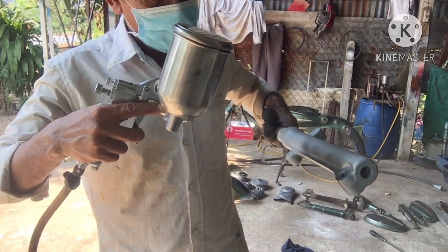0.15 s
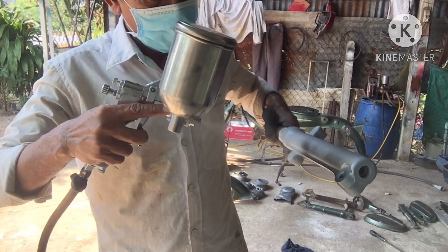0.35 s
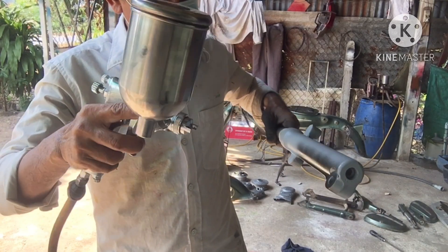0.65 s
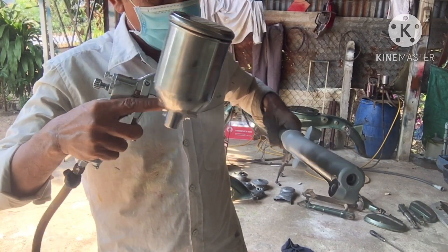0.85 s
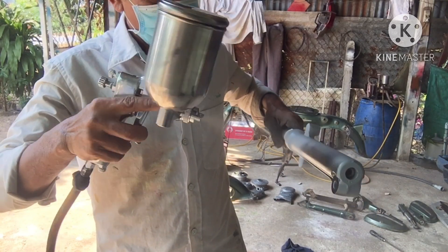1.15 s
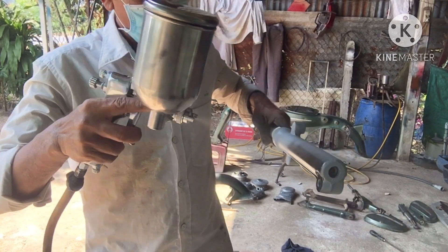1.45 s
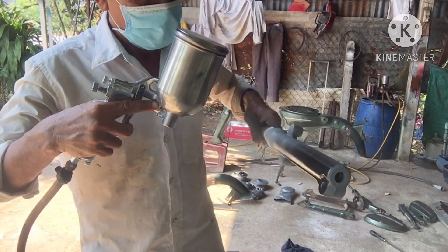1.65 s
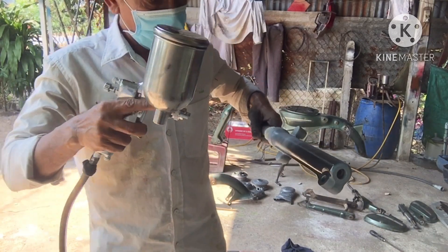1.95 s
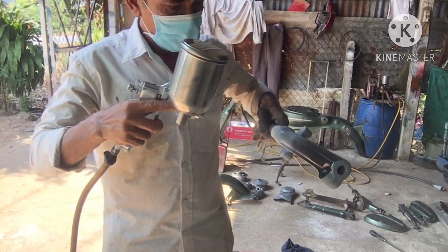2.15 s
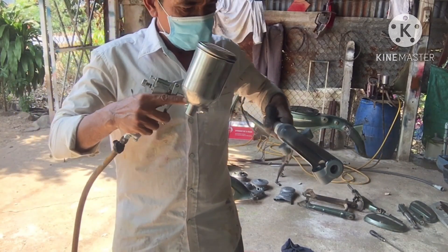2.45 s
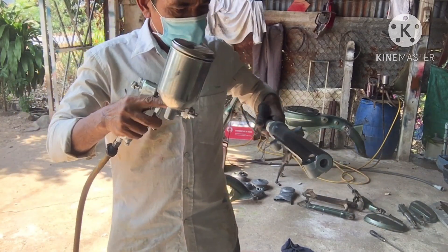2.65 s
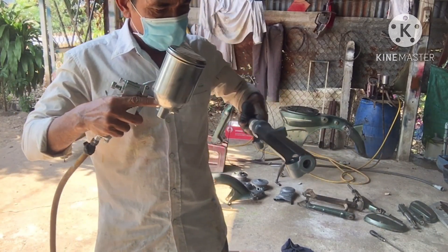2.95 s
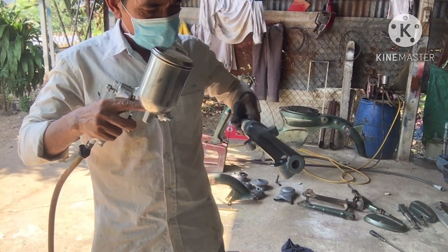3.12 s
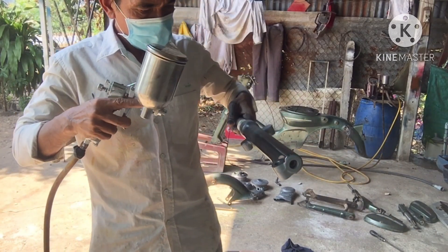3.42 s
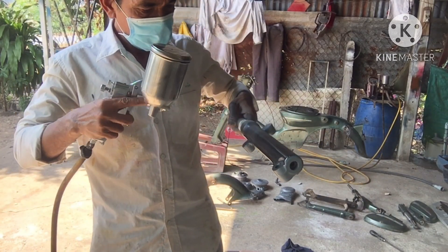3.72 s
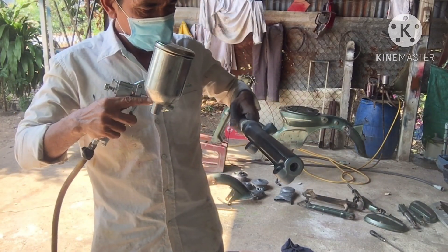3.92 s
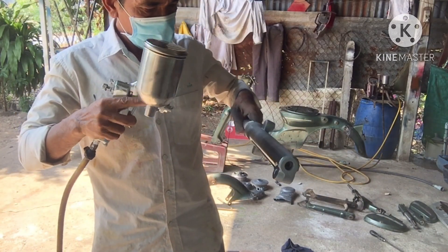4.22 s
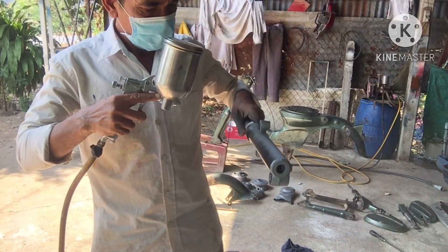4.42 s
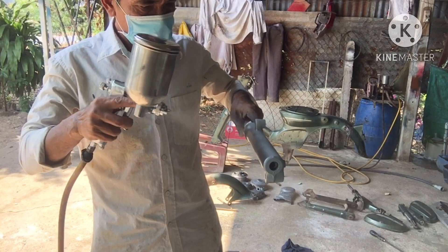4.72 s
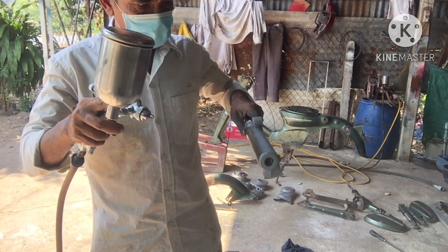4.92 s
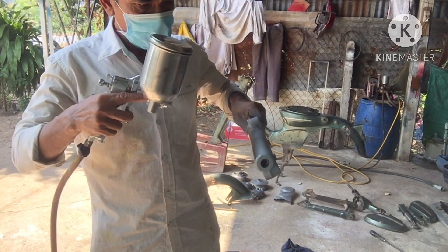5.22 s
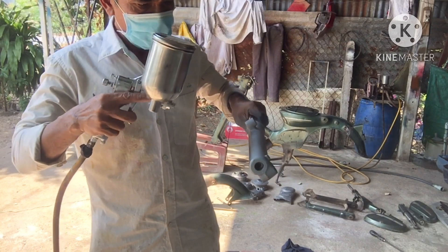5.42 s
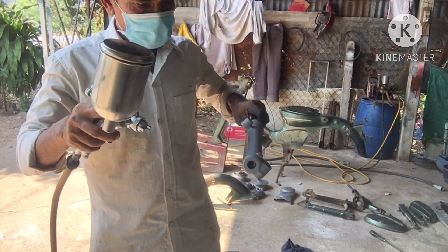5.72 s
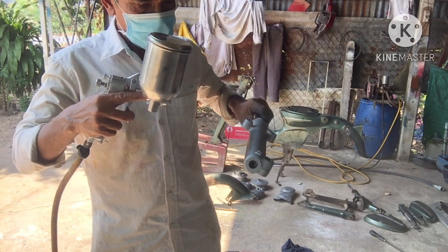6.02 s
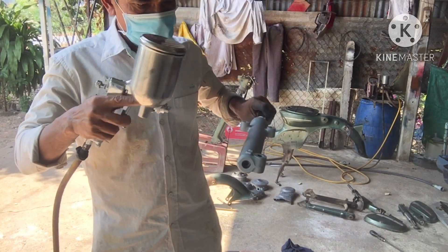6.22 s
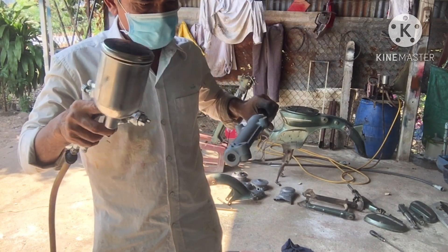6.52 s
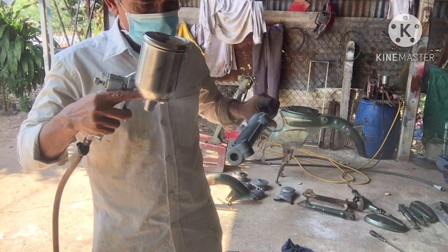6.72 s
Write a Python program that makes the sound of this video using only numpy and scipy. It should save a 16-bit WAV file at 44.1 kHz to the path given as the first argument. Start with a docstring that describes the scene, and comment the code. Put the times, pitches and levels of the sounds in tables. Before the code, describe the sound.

In an open workshop, an air compressor runs in the background with a fast, even chug and a wavering low hum. In front of it, near the microphone, a paint spray gun gives an unbroken hiss that sharpens and softens as it passes back and forth. Thin, brief whistles flick through the spray now and then, and soft puffs of air rumble on the microphone.

```python
"""A close, unbroken hiss: a compressed-air spray gun sweeps paint over a metal part near a phone.
Its turbulent jet turns bright and dull as each pass aims it toward and away from the phone,
and whistles briefly where it grazes an edge. Further back in the open-sided workshop a piston
compressor chugs eleven times a second, valve puffs ringing its intake while its motor hums
and drones. Stray air rumbles softly underneath."""
import sys
import numpy as np
from scipy import signal
from scipy.fft import rfft, irfft
from scipy.io import wavfile
from scipy.ndimage import uniform_filter1d, map_coordinates

SR = 44100
rng = np.random.default_rng(int(sys.argv[2]) if len(sys.argv) > 2 else 0)


def transcribe(signal):
    """Save signal, clipped to [-1, 1], as a 16-bit WAV file at the path in sys.argv[1]."""
    frames = np.atleast_2d(signal).T
    limited = np.clip(frames, -1, 1)
    pcm = np.round(limited * 32767).astype(np.int16)
    wavfile.write(sys.argv[1], SR, pcm)


N = 302967
TIME = np.arange(N) / SR
FREQ = np.maximum(np.arange(N // 2 + 1) * SR / N, 1e-3)
NARROW_HZ, TOP_HZ = 7030, 15730  # the top band of the hiss, where the jet beams most narrowly

# colour of the stray air and the yard: (frequency [Hz], relative level [dB])
RUMBLE_COLOUR = [(20, -40), (32, -24), (45, -24), (80, 4), (125, 0), (200, 2.5), (450, 1.5), (750, -12),
                 (1500, -87)]
# puffs of stray air on the microphone: (time [s], half length [s], level [dB])
AIR_GUSTS = [(.1, .2, -42.5), (4.54, 0.056, -41), (5.25, 0.037, -39), (5.703, .1, -45), (6.023, 0.081, -50)]
# motor and belt tones: (frequency [Hz], level [dB], waver [0-1])
MOTOR_TONES = [(99.7, -52.5, 0.22), (235, -51.5, 0.14), (517, -72, 0.04), (652, -53.5, .7),
               (688, -53, 0.48), (697, -53, 0.67), (1032, -59, 0.5), (1072, -55, 0.28)]
# strongest swells of the drone: (time [s], level [dB])
DRONE_SWELLS = [(1.7, -43), (2.57, -40), (3.25, -43), (3.51, -42), (4.4, -42), (5.3, -38), (6.04, -40)]
# compressor speed: (time [s], speed [turns/s])
CRANK_SPEED = [(0, 11.136), (3, 11.144), (6.87, 11.159)]
# valve puffs in each crank turn: (position [turns], relative level [dB])
VALVE_PUFFS = [(.04, -3.8), (.137, -4.8), (.198, 2.6), (.273, -4.1), (.434, -11), (.613, -6.7),
               (.824, -4.5)]
# resonances of the intake and tank: (frequency [Hz], width [Hz], relative level [dB])
INTAKE_MODES = [(100, 100, -25), (318, 42, 0), (445, 48, -20), (615, 45, -23), (682, 28, -15)]
# the jet grazing an edge: (time [s], half length [s], frequency [Hz], level [dB])
EDGE_WHISTLES = [(0.218, .05, 12150, -35), (.29, .04, 12450, -37), (3.08, .06, 12100, -34),
                 (3.92, .07, 12050, -38), (4.55, .04, 11500, -34), (6.13, .04, 12000, -39)]
# colour of the jet: (frequency [Hz], relative level [dB])
JET_COLOUR = [(300, -9), (780, -16.5), (1100, -10), (1600, -7), (2100, -6), (2800, -0.46), (4300, 0.3),
              (6700, -0.93), (8000, -4.5), (12000, -3.5), (15500, -5.5)]
# hollows where reflections near the nozzle cancel: (frequency [Hz], half width [Hz], gain [dB])
NOZZLE_HOLLOWS = [(3660, 410, -1.6), (4885, 300, -3.5), (6040, 210, -3.5), (7450, 300, -2.5),
                  (10450, 430, -4)]
# the jet's rush, closer for the first few passes: (time [s], level before trim [dB])
RUSH_LEVELS = [(0.0, -24), (0.23, -27), (0.6, -24), (1.03, -27), (1.23, -23.5), (1.83, -28), (1.94, -26.5),
               (2.26, -28.5), (2.81, -27.5), (2.86, -29), (4.6, -29), (4.83, -27), (4.98, -28),
               (6.5, -28.5)]
# passes of the gun, wrist turn to wrist turn: (start [s], length [s], sizzle lift at full swing [dB])
GUN_PASSES = [(-0.15, 0.39, 5), (0.084, 0.51, 5.5), (0.396, 0.52, 8.5), (0.832, 0.53, 5.5), (1.15, 0.49, 9),
              (1.712, 0.57, 6.5), (2.28, 0.49, 3), (2.57, 0.31, 8), (2.92, 0.49, 5), (3.372, 0.44, 5.5),
              (3.816, 0.24, 8), (4.026, 0.36, 7), (4.383, 0.3, 6), (4.597, 0.71, 3.5), (4.903, 0.36, 6.5),
              (5.27, 0.39, 4.8), (5.622, 0.39, 6.5), (6.005, 0.42, 4), (6.35, 0.38, 6.5), (6.75, 0.33, 6)]


def undb(db):
    """Decibels to gain."""
    return 10 ** (np.asarray(db) / 20)


def level(x, db=0):
    """Set the rms level."""
    return x * undb(db) / np.sqrt(np.mean(x ** 2))


def curve(table):
    """A (time, value) table drawn out sample by sample."""
    return np.interp(TIME, *np.transpose(table))


def bell(axis, centre, half_width):
    """A smooth bump of height 1, in time or frequency."""
    return np.exp(-((axis - centre) / half_width) ** 2)


def shape(x, response):
    """Filter by a frequency response."""
    return irfft(rfft(x) * response, N)


def noise(response):
    """Coloured noise of unit rms."""
    return level(shape(rng.standard_normal(N), response))


def colour(points):
    """EQ curve through (frequency [Hz], level [dB]) points."""
    hz, db = np.transpose(points)
    return undb(np.interp(np.log(FREQ), np.log(hz), db))


def below(hz, slope):
    """The low side of a crossover."""
    return 1 / (1 + (FREQ / hz) ** slope)


def resonance(hz, width):
    """A steep resonance: two band-passes in a row."""
    return 1 / (1 + 1j * (FREQ / hz - hz / FREQ) * hz / width) ** 2


def walk(rate):
    """Smooth random drift of unit rms, changing about rate times a second."""
    hold = max(int(SR / rate / 3), 1)
    steps = np.repeat(rng.standard_normal(N // hold + 1), hold)[:N]
    return level(uniform_filter1d(uniform_filter1d(steps, hold), hold))


def come_up(early_db, middle_s=2.1, half_length_s=0.3):
    """A fader ride from early_db to unity: the machine starts a little weaker and comes up once."""
    return undb(early_db * (1 - np.tanh((TIME - middle_s) / half_length_s)) / 2)


def draught(steady_db=-47, yard_db=-47, gust_hz=140):
    """Deep stray air with a few stronger puffs, over the steady murk of the yard."""
    rumble, lows = colour(RUMBLE_COLOUR), below(gust_hz, 4)
    gusts = sum(undb(db) * bell(TIME, s, half) for s, half, db in AIR_GUSTS)
    air = noise(rumble * lows) * (undb(steady_db) + gusts)
    yard = noise(rumble * (1 - lows)) * undb(yard_db)
    return air + yard


def motor_hum(waver_rate=7):
    """Mains hum and belt tones that waver in strength and pitch."""
    hum = 0
    for hz, db, waver in MOTOR_TONES:
        wobble = 1 - waver + waver * (walk(waver_rate) + 1j * walk(waver_rate))
        hum += level(np.real(wobble * np.exp(2j * np.pi * hz * TIME)), db)
    return hum


def motor_drone(hz=156, wander_hz=1, bed_db=-43, waver=0.54, waver_rate=9, swell_half_s=0.045):
    """A low motor tone that keeps coming and going, a little unsteady in pitch."""
    cycles = np.cumsum(hz + wander_hz * walk(4.87)) / SR
    wobble = 1 + waver * (walk(waver_rate) + 1j * walk(waver_rate))
    wobble /= np.sqrt(np.mean(np.abs(wobble) ** 2))
    bed = wobble * undb(bed_db) * come_up(early_db=-3.5)
    swells = sum(undb(db) * bell(TIME, s, swell_half_s) for s, db in DRONE_SWELLS)
    return np.sqrt(2) * np.real((bed + swells) * np.exp(2j * np.pi * cycles))


def intake(broaden=1):
    """The hollow ring of the intake and tank, as a frequency response."""
    return sum(undb(db) * resonance(hz, width * broaden) for hz, width, db in INTAKE_MODES)


def compressor(chug_db=-30.5, air_db=-41.5, scatter_db=0.4, slip_ms=0.05, surge=0.08):
    """Each crank turn lets the same run of valve puffs ring the intake; air rushes in with them."""
    turns = np.cumsum(curve(CRANK_SPEED)) / SR
    position, puff_db = np.transpose(VALVE_PUFFS)
    puff_turns = np.arange(int(turns[-1]) + 1)[:, None] + position
    # no two puffs are quite alike in timing or size
    slip, scatter = rng.standard_normal((2,) + puff_turns.shape)
    onsets = np.searchsorted(turns, puff_turns) + slip * slip_ms * SR / 1000
    onsets = np.clip(onsets, 0, N - 1).astype(int)
    sizes = undb(puff_db + scatter_db * scatter) * (puff_turns < turns[-1])
    puffs = np.bincount(onsets.ravel(), sizes.ravel(), N)
    chug = shape(puffs, intake())
    # turbulent air swells a little with the puffs and sounds the same resonances more broadly
    flow = np.abs(shape(puffs, bell(FREQ, 0, 30))) ** surge
    air = shape(flow * rng.standard_normal(N), intake(broaden=1.77))
    return (level(chug, chug_db) + level(air, air_db)) * come_up(early_db=-1.3)


def edge_whistles(width_hz=320):
    """Narrow bands of the jet swell for a moment on an edge of the part."""
    return sum(noise(resonance(hz, width_hz)) * undb(db) * bell(TIME, s, half)
               for s, half, hz, db in EDGE_WHISTLES)


def gun_aim(swing_in_s=0.21, swing_out_s=0.35):
    """Sizzle lift in dB: each pass swings quickly toward the phone and more slowly away."""
    def ease(progress):
        # a power under 1 makes the turn of the wrist abrupt
        return np.sin(np.pi / 2 * np.clip(progress, 0, 1)) ** 0.73

    lifts = [db * ease((TIME - start) / swing_in_s) * ease((start + length - TIME) / swing_out_s)
             for start, length, db in GUN_PASSES]
    return np.max(lifts, axis=0)


def treble_flicker(x, bands=24, depth_db=1.35, rate=9):
    """Each narrow band of the treble flickers on its own, so the colour shifts irregularly."""
    centres = np.linspace(NARROW_HZ, TOP_HZ, bands)
    return sum(shape(x, np.interp(FREQ, centres, band)) * undb(depth_db * walk(rate))
               for band in np.eye(bands))


def with_reflection(x, lag_ms, drift, gain=0.12):
    """One bounce with a changing path slides a faint comb through the hiss; returns unit rms."""
    lag = lag_ms * np.exp(drift * walk(2.01)) * SR / 1000
    bounce = map_coordinates(x, [np.arange(N) - lag], order=3, mode="wrap")
    return level(x + gain * bounce)


def spray_gun(rush_trim_db=1.18, sizzle_away_db=-25.6, roar_hz=2000, beam_hz=5200):
    """Turbulent jet: the long waves spread as a rush, the short ones beam as a sizzle with the aim."""
    hollows_db = sum(db * bell(FREQ, hz, half) for hz, half, db in NOZZLE_HOLLOWS)
    jet = colour(JET_COLOUR) * undb(hollows_db)
    deep, spread, broad = below(roar_hz, 6.7), below(beam_hz, 6.7), below(NARROW_HZ, 16)
    lift_db = gun_aim()
    swing_db = lift_db - lift_db.mean()
    # the deep roar leaves the jet at another angle, so it thins as the sizzle rises
    rush = noise(jet * np.sqrt(spread))
    roar = shape(rush, deep) * undb(-0.59 * swing_db)
    rush = roar + shape(rush, 1 - deep) * undb(0.057 * swing_db)
    # the lower sizzle has a broader beam and swings less than the top
    sizzle = noise(jet * np.sqrt(1 - spread))
    low_sizzle = shape(sizzle, broad) * undb(-0.22 * swing_db)
    sizzle = low_sizzle + treble_flicker(shape(sizzle, 1 - broad))
    # the rush comes back off the painter's chest, the sizzle off the part just ahead of the nozzle
    rush = with_reflection(rush, lag_ms=2.414, drift=0.142) * undb(curve(RUSH_LEVELS) + rush_trim_db)
    sizzle = with_reflection(sizzle, lag_ms=0.818, drift=0.233) * undb(sizzle_away_db + lift_db)
    spatter = undb(0.18 * walk(150))  # paint tears off the nozzle unevenly and roughens the sizzle
    flutter = undb(0.38 * walk(9.9))
    return (rush + sizzle * spatter) * flutter


def scene():
    """The gun up front, machine and air behind: one microphone, alike in both channels."""
    mix = spray_gun() + edge_whistles() + compressor() + motor_hum() + motor_drone() + draught()
    return np.array([mix, mix])


def record(dry):
    """The phone cuts the deepest bass and the very top."""
    low_cut = signal.butter(N=8, Wn=40, btype="high", fs=SR, output="sos")
    high_cut = signal.ellip(12, 0.1, 80, TOP_HZ, fs=SR, output="sos")
    return signal.sosfilt(high_cut, signal.sosfilt(low_cut, dry))


dry = scene()
out = record(dry)
transcribe(out)
```